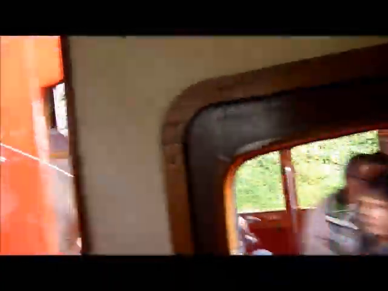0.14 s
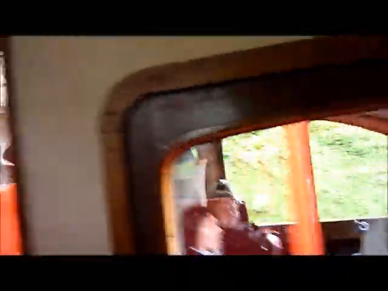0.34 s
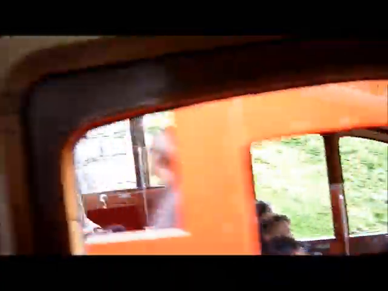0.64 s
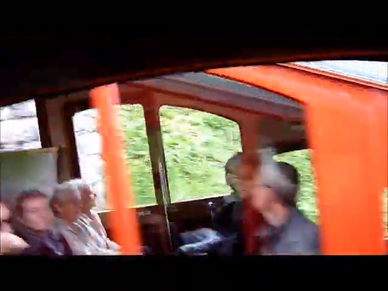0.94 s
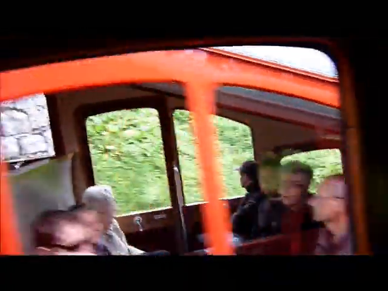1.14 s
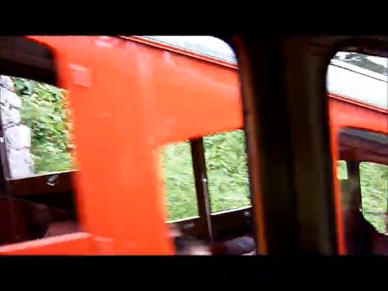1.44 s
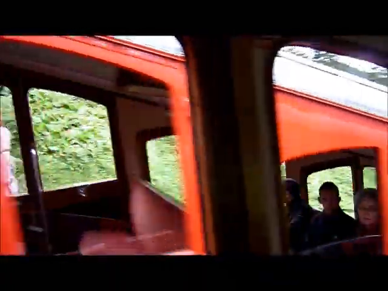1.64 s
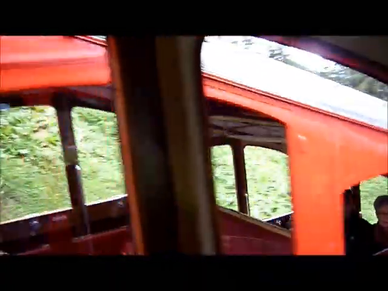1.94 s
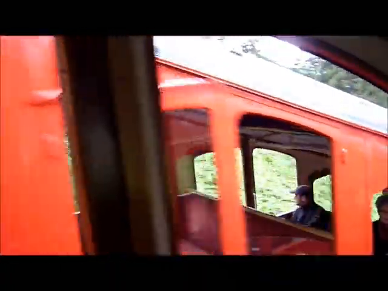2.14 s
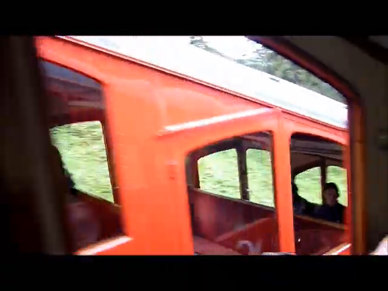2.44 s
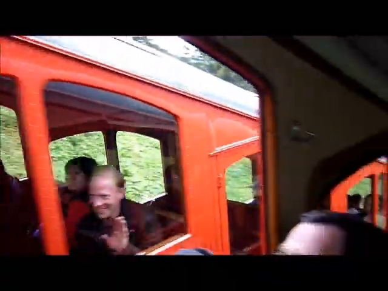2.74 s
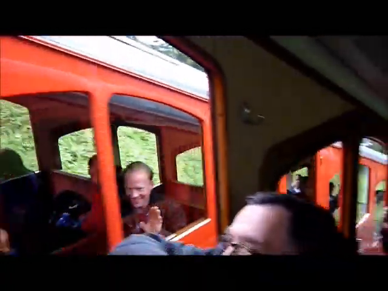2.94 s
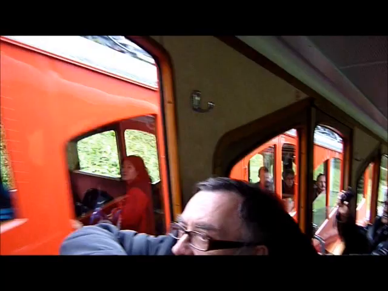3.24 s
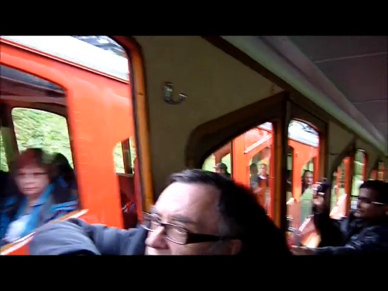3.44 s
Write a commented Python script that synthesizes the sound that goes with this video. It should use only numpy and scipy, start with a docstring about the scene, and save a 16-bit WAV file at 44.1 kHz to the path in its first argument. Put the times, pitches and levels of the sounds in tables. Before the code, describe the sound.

The dense rumble of a slow cog train fills the cabin around the microphone. A wavering whine, gear hum and light hiss run over a low drone, with irregular cog knocks, rattling fittings and a faint squeak near the end.

```python
"""A dense, booming rumble fills the cabin of a slowly climbing rack railcar. Countless small contacts of wheels
and cog excite the car body, and the cabin air and panels resonate at their natural frequencies. The gears hum
and the drive whines over a low shaft drone, a narrow hiss throbs high above, cog teeth knock at uneven
intervals, and two metal fittings rattle. Brief rings, clatter, bass swells, a thump, a clink and a faint squeak
come and go."""
import sys
import numpy as np
from scipy import signal
from scipy.fft import rfft, irfft
from scipy.io import wavfile
from scipy.ndimage import uniform_filter1d

SR = 44100
rng = np.random.default_rng(int(sys.argv[2]) if len(sys.argv) > 2 else 0)


def int16_out(signal):
    """Quantize to a 16-bit WAV file."""
    q = np.round(np.clip(np.atleast_2d(signal).T, -1, 1) * 32767)
    wavfile.write(sys.argv[1], SR, q.astype(np.int16))


N = 158760
TIME, FREQS = np.arange(N) / SR, np.fft.rfftfreq(N, 1 / SR)

# Levels are relative within each source. Shaft drone: t/s, f/Hz, level/dB
SHAFT_DRONE = [(0, 44.8, -44.5), (1.939, 46, -47), (2.5, 43.7, -49), (3.05, 43.8, -46), (3.6, 43.3, -48)]
# Bursts of band noise: centre t/s, duration/s, f/Hz, bandwidth per stage/Hz, level/dB
NOISE_BURSTS = [(0.357, 0.093, 740, 250, -33), (0.492, 0.15, 760, 249, -27.5),
                (1.403, 0.27, 87.3, 24.8, -35), (1.494, .015, 3080, 900, -34), (2.252, .3, 89, 30.2, -36),
                (2.526, 0.059, 790, 450, -21.5), (2.754, .7, 778, 300, -31.5),
                (2.524, 0.083, 2800, 1500, -48)]
# Short decaying tones: onset t/s, f/Hz, level/dB, attack/s, T60/s
DECAYING_TONES = [(.04, 127, -13.5, 0.023, 0.2), (1.473, 300, -6, .004, 0.038),
                  (1.946, 477, -7.5, .01, 0.077), (2.305, 257, -15.5, 0.011, 0.13),
                  (2.505, 800, -15, .006, .07), (2.862, 655, -13, 0.014, 0.15),
                  (3.017, 270, -12, 0.0048, 0.1), (3.297, 222, -12.5, 0.011, 0.15),
                  (3.352, 665, -12, .012, 0.15), (3.385, 245, -11.5, .01, 0.11),
                  (3.456, 1580, -34, 0.018, 1)]
# Resonances of two rattling fittings: f/Hz, bandwidth/Hz, level/dB
RATTLE_RESONANCES = [(1059, 78, -4), (1824, 40, -1.5)]
# Their envelopes: t/s, lower level/dB, upper level/dB
RATTLE_LEVELS = [(0.0, -38, -49), (0.06, -47, -38.5), (0.38, -40, -39.5), (0.87, -39, -38),
                 (0.97, -31.5, -41.5), (1.5, -36, -42.5), (1.53, -42, -50), (1.6, -31, -37),
                 (1.69, -33, -46), (1.83, -29.5, -46), (2.87, -42, -41), (3.08, -29, -48.5),
                 (3.34, -40, -40), (3.36, -36, -35), (3.42, -42, -52), (3.6, -38, -45)]
# Envelopes of the drive tones: t/s, gear level/dB, motor level/dB, lower whine level/dB
DRIVE_LEVELS = [(0.0, -28, -43, -22), (0.05, -33, -23, -21), (0.09, -47, -31.5, -21.5),
                (0.27, -30.5, -21.5, -29), (0.31, -27, -35, -26.5), (0.71, -33, -25, -29.5),
                (0.77, -27, -24, -18), (0.81, -40, -40, -26.5), (0.9, -48, -33, -32), (0.98, -27, -36, -24),
                (1.03, -34.5, -40, -43), (1.08, -24, -24, -25), (1.14, -26, -27, -31),
                (1.19, -25, -33, -25), (1.39, -33, -26, -41), (1.48, -25, -31, -30),
                (1.51, -32.5, -43, -35), (1.66, -23, -39, -22), (1.75, -27.5, -20, -25),
                (1.81, -42, -31, -40.5), (1.97, -44, -31, -29.5), (2.15, -28.5, -32, -39),
                (2.21, -26, -35, -20.5), (2.25, -29, -36, -39), (2.42, -26.5, -27, -26),
                (2.46, -33.5, -36, -31), (2.53, -20.5, -25, -32), (2.58, -33.5, -38, -31),
                (2.72, -20.5, -32, -27), (2.84, -43, -26, -34), (3.09, -26.5, -40.5, -34.5),
                (3.47, -39.5, -34, -32.5), (3.56, -24, -38, -33), (3.6, -40, -38, -35)]
# Cog tooth impacts: t/s, level/dB, thud level re impact/dB
TOOTH_IMPACTS = [(0.044, -12.5, -12), (0.167, -12, -9), (0.219, -16, -8), (0.323, -13, -10),
                 (0.442, -9, -9), (0.569, -10, -10), (0.6, -9.5, -15), (0.644, -15, -14), (0.719, -14, -10),
                 (0.868, -9.5, -11), (0.977, -11, -6), (1.068, -9.5, -13.5), (1.082, -15.5, -2),
                 (1.198, -8, -11), (1.228, -7, -11), (1.295, -10, -14), (1.475, -10, -9),
                 (1.617, -11.5, -5), (1.662, -13.5, -3), (1.95, -13.5, -11), (2.189, -13, -5),
                 (2.324, -15, -3), (2.409, -12, -6), (2.492, -12.5, -7), (2.629, -13, -10),
                 (2.858, -10, -14), (3.016, -25, 1), (3.537, -11.5, -12)]
# Modes of the frame: f/Hz, level/dB, T60/s
FRAME_MODES = [(446, -4.5, 0.072), (484, -3.5, 0.06), (910, -15, 0.014), (3200, -23.5, .015)]
# Modes of the cabin air (low, high) and of the panels: f/Hz, bandwidth/Hz, level/dB
LOW_CABIN_MODES = [(422.8, 16, -15), (459.3, 21, -12), (514, 22, -13.5)]
HIGH_CABIN_MODES = [(650, 29, -4)]
PANEL_MODES = [(134.4, 15, -35.5), (243.4, 29, -35), (362.7, 19, -37), (529, 4.6, -37), (829, 24, -42)]
# Noise envelopes: t/s, rumble level/dB, low boom level/dB, high boom level/dB, hiss level/dB
RIDE_LEVELS = [(0.03, -20.5, -22, -22, -37), (0.09, -23, -18, -29, -45), (0.3, -20.5, -20, -38, -36.5),
               (0.31, -19.5, -22.5, -37, -37), (0.7, -20, -24, -47, -38), (0.74, -22.5, -12, -38, -37),
               (0.84, -21, -34, -36, -37), (0.96, -19.5, -14, -39, -38), (1.03, -22, -43, -43, -36),
               (1.07, -20.5, -18, -49, -38), (1.18, -19, -42, -34, -38), (1.19, -19.5, -22.5, -23.5, -38),
               (1.55, -18.5, -34, -38, -37), (1.68, -19.5, -20, -39, -38.5), (1.88, -20.5, -36, -30.5, -37),
               (1.94, -18, -33, -31, -40), (2.07, -18, -33, -27, -36.5), (2.84, -20.5, -25.5, -25.5, -37.5),
               (2.87, -20.5, -19, -17, -40), (2.98, -20, -36, -29.5, -36.5), (3.41, -19.5, -47, -25, -34),
               (3.57, -21.5, -23, -26.5, -35.5)]
# Response of the car body to rolling contact: f/Hz, level/dB
BODY_RESPONSE = [(20, -39), (30, -21), (42, -24), (60, -15), (90, -5.5), (125, -4), (173, -5), (256, -4.5),
                 (386, -8.5), (474, -3.5), (570, -8.5), (658, -9), (980, -14), (2350, -27), (5550, -35.5),
                 (6100, -32), (7000, -38), (8500, -40.5)]
# Treble loss on the way to the listener: f/Hz, level/dB
TREBLE_LOSS = [(7450, 0), (7700, -5), (7950, -15), (8150, -26), (8300, -32)]

CONTACTS_PER_S = 12000
HISS_HZ, TOOTH_HZ = 6590, 9.6
GEAR_HZ, MOTOR_HZ, WHINE_HZ = 264.2, 485.5, 431.5
BASS_HZ, BASS_DB_PER_S = 200, -2
TREBLE_HZ, TREBLE_DB_PER_S = 2000, 0.1


def undb(db):
    """Amplitude ratio of a level in dB."""
    return 10 ** (np.asarray(db) / 20)


def unit(x):
    """Normalisation to rms 1."""
    return x / np.sqrt(np.mean(x ** 2))


def envelope(table, column):
    """Gain over time, interpolated linearly in dB."""
    rows = np.array(table)
    return undb(np.interp(TIME, rows[:, 0], rows[:, column]))


def drift(rate_hz):
    """Slow fluctuation: random steps smoothed by two moving averages."""
    hold = int(SR / rate_hz)
    steps = np.repeat(rng.standard_normal(N // hold + 1), hold)
    return 1.27 * uniform_filter1d(uniform_filter1d(steps, hold), hold)[:N]


def contacts():
    """Broadband excitation: shot noise of tiny, uneven steel contacts over weaker white noise."""
    hits = rng.random(N) < CONTACTS_PER_S / SR
    strength = rng.standard_normal(N) * undb(rng.exponential(size=N))
    return hits * strength + 0.37 * rng.standard_normal(N)


def resonate(x, hz, width_hz, stages=1):
    """Forced response of identical second-order resonators in cascade, at rms 1."""
    for _ in range(stages):
        x = unit(signal.lfilter(*signal.iirpeak(hz, hz / width_hz, fs=SR), x))
    return x


def driven_modes(modes):
    """Modal superposition, each mode driven by its own contact noise."""
    return sum(undb(db) * resonate(contacts(), hz, width) for hz, width, db in modes)


def damped_mode(t, hz, db, t60):
    """Free vibration: a sinusoid that falls 60 dB in t60 seconds."""
    return undb(db - 60 * t / t60) * np.sin(2 * np.pi * hz * t)


def tone(hz, wander):
    """Sinusoid of rms 1 with random frequency modulation of relative depth wander."""
    cycles = np.cumsum(hz * (1 + wander * drift(6))) / SR
    return np.sqrt(2) * np.sin(2 * np.pi * (cycles + rng.random()))


def shaft():
    """Periodic forcing by the turning shaft gives a low drone whose pitch sags slightly."""
    times, hz, _ = np.array(SHAFT_DRONE).T
    return tone(np.interp(TIME, times, hz), wander=.003) * envelope(SHAFT_DRONE, 2)


def throbbing_hiss():
    """Amplitude modulation: a narrow band of hiss near 6.6 kHz throbs at the rack tooth rate."""
    throb = 1 + 0.12 * tone(TOOTH_HZ, wander=0.071)
    hiss = resonate(rng.standard_normal(N), HISS_HZ, width_hz=740, stages=4)
    return hiss * throb * envelope(RIDE_LEVELS, 4) * undb(-9)


def noise_bursts():
    """Band-limited noise under Gaussian envelopes: clatter, a clink and low bass swells."""
    out = np.zeros(N)
    for centre, duration, hz, width, db in NOISE_BURSTS:
        swell = undb(db) * np.exp(-(2 * (TIME - centre) / duration) ** 2)
        out += swell * resonate(contacts(), hz, width, stages=2)
    return out


def decaying_tones():
    """Damped oscillation after a linear attack: a low thump, brief rings and a faint squeak."""
    out = np.zeros(N)
    for onset, hz, db, attack, t60 in DECAYING_TONES:
        age = np.maximum(TIME - onset, 0)
        out += np.minimum(age / attack, 1) * damped_mode(age, hz, db, t60)
    return out


def rattling_fittings():
    """Forced vibration: contact noise makes two metal fittings ring by turns."""
    return sum(driven_modes([mode]) * envelope(RATTLE_LEVELS, column)
               for column, mode in enumerate(RATTLE_RESONANCES, start=1))


def drive_tones():
    """Periodic forces in gear mesh and motor radiate a flickering hum and a wavering double whine."""
    hum = tone(GEAR_HZ, wander=.004) * envelope(DRIVE_LEVELS, 1) * undb(-1.5 + 2.5 * drift(25))
    motor = tone(MOTOR_HZ, wander=.006) * envelope(DRIVE_LEVELS, 2) * undb(-2)
    whine = tone(WHINE_HZ, wander=.015) * envelope(DRIVE_LEVELS, 3) * undb(-3.5)
    return hum + motor + whine


def cog_knocks():
    """Impulse response: each tooth impact excites the frame modes and a thud of its own strength."""
    t, out = np.arange(SR // 10) / SR, np.zeros(N + SR)
    frame = sum(damped_mode(t, *mode) for mode in FRAME_MODES)
    for onset, db, thud_db in TOOTH_IMPACTS:
        start = int(onset * SR)
        thud = damped_mode(t, hz=256, db=thud_db, t60=.04)
        out[start:start + len(t)] += undb(db - 3) * (frame + thud)
    return out[:N]


def cabin_boom():
    """Resonance at fixed frequencies: the enclosed air booms in swells, the panels ring steadily."""
    low = driven_modes(LOW_CABIN_MODES) * envelope(RIDE_LEVELS, 2)
    high = driven_modes(HIGH_CABIN_MODES) * envelope(RIDE_LEVELS, 3)
    return low + high + driven_modes(PANEL_MODES)


def rolling_rumble():
    """Source and filter: the car body colours the contact noise of wheels and rack."""
    hz = np.maximum(FREQS, 1)
    body_hz, body_db = np.array(BODY_RESPONSE).T
    spectrum = rfft(contacts()) * undb(np.interp(np.log(hz), np.log(body_hz), body_db))
    half_octaves = np.maximum(2 * np.log2(hz / 30), 0)
    swell_db, out = -0.86 * drift(3.3), np.zeros(N)
    for k in range(18):  # half-octave bands swell together and flicker independently
        centre_hz = 30 * 2 ** (k / 2)
        band = irfft(spectrum * np.clip(1 - abs(half_octaves - k), 0, 1), N)
        flicker_db = (1.0 if centre_hz < TREBLE_HZ else .3) * drift(9.06)
        # the bass thins with time and the treble grows a little
        db_per_s = BASS_DB_PER_S * (centre_hz < BASS_HZ) + TREBLE_DB_PER_S * (centre_hz > TREBLE_HZ)
        out += band * undb(swell_db + flicker_db + db_per_s * TIME)
    return unit(out) * envelope(RIDE_LEVELS, 1) * undb(-1)


def scene():
    """Linear superposition of all sources in one channel."""
    sustained = rolling_rumble() + rattling_fittings() + cabin_boom() + throbbing_hiss() + drive_tones()
    return (sustained + shaft() + cog_knocks() + decaying_tones() + noise_bursts())[None]


def record(dry):
    """Low-pass filtering softens the treble and cuts the top; a constant offset is added."""
    softened = irfft(rfft(dry) * undb(np.interp(FREQS, *np.array(TREBLE_LOSS).T)), N)
    cutoff_hz, offset = 8260, -.0712
    low_pass = signal.ellip(14, .2, 60, cutoff_hz, fs=SR, output="sos")
    return signal.sosfilt(low_pass, softened) + offset


dry = scene()
out = record(dry)
int16_out(out)
```